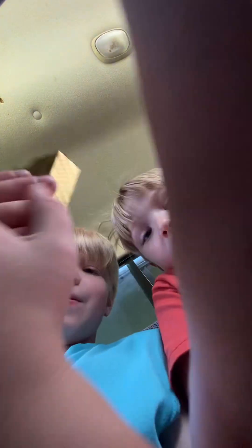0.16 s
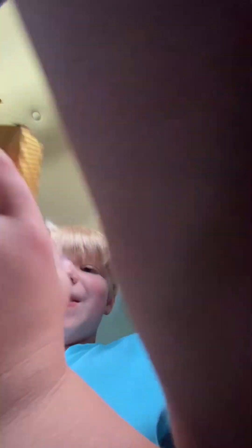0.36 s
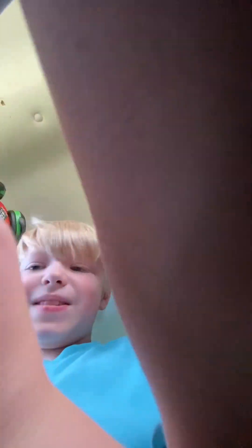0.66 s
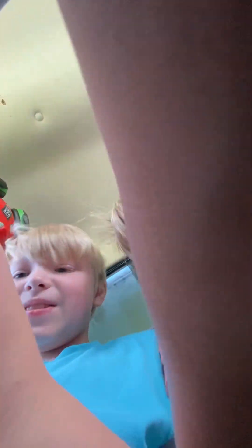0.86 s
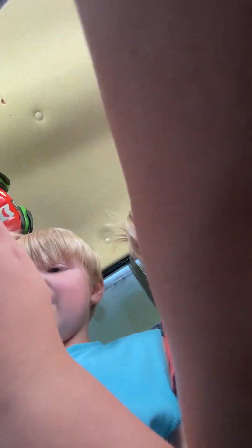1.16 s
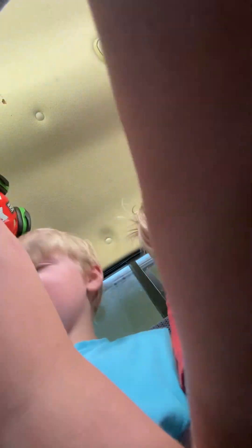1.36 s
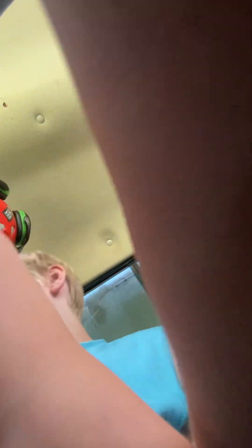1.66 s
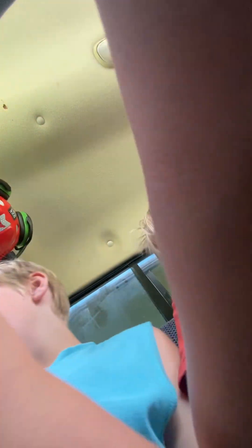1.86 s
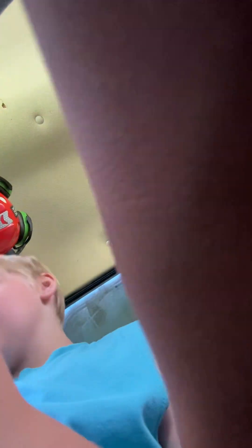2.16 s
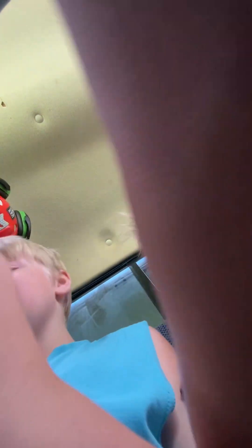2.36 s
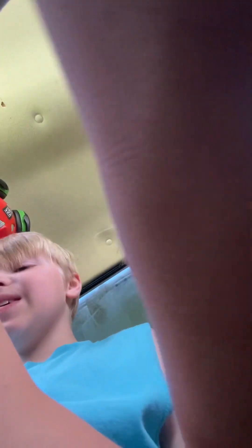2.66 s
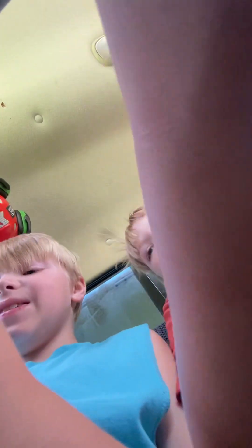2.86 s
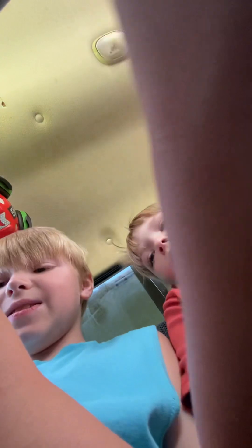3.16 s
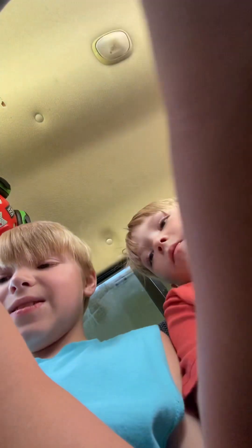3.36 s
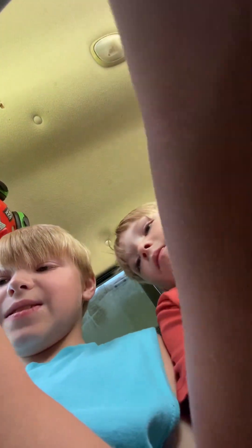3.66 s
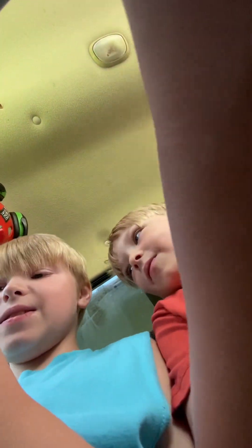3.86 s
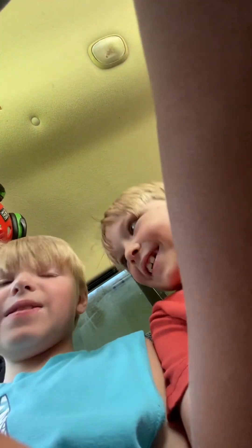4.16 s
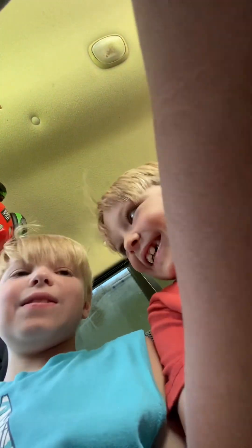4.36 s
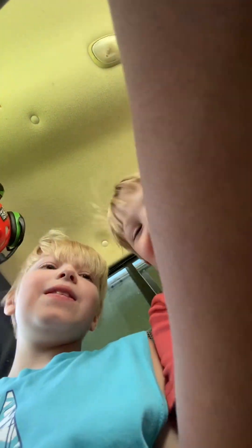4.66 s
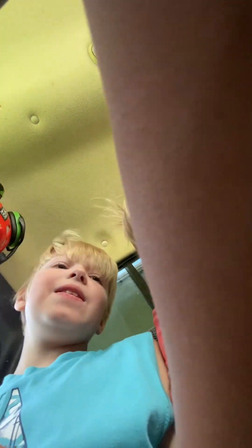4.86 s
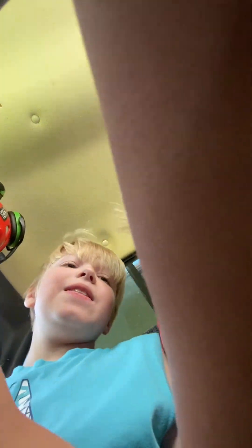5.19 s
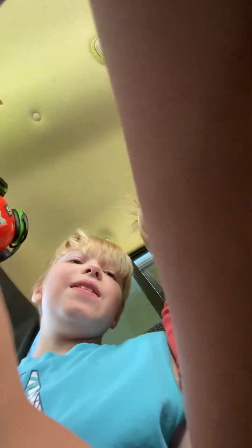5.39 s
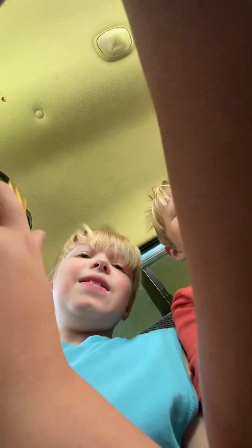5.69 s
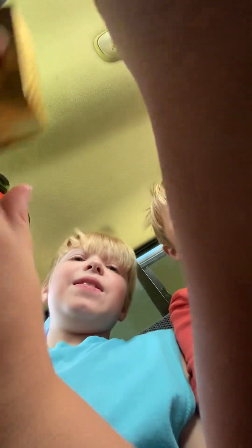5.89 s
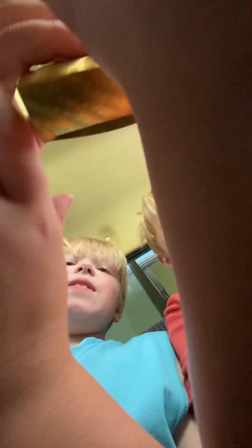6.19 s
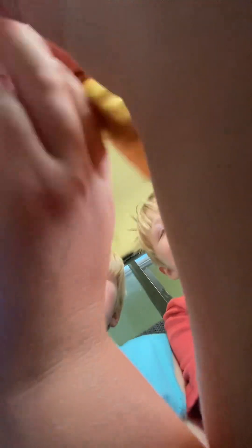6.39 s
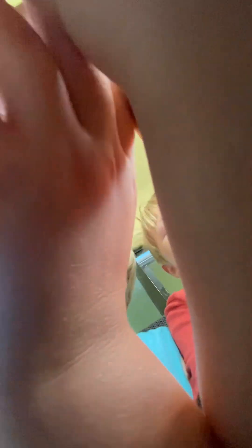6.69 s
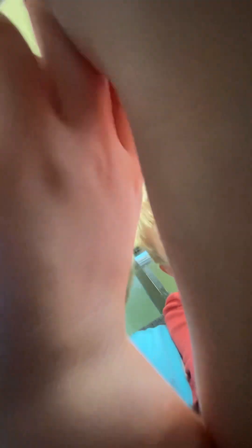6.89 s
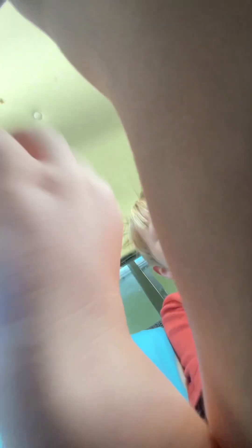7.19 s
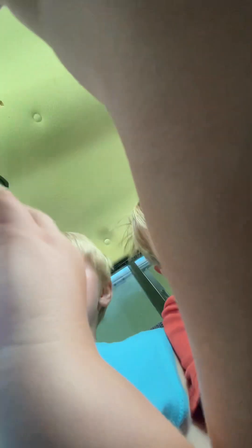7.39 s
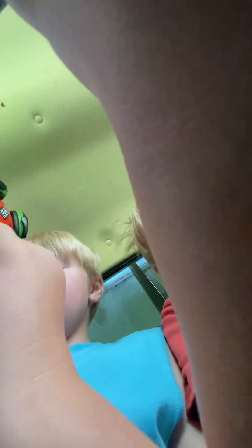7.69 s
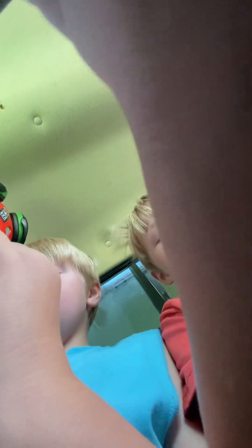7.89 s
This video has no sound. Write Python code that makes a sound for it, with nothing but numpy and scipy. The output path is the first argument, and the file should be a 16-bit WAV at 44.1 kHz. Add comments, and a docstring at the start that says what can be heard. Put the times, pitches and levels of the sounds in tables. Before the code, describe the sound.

Inside a large vehicle gathering speed, a low engine boom holds steady, then climbs slightly in pitch and swells with tyre and air roar. Trim panels ping faintly. Small hard clicks cluster close to the microphone in the first half, then return more sparsely with short cloth rustles. A phone held low hears it all in stereo, boomy and muffled, with no talking.

```python
"""Inside a large vehicle that gathers speed, heard by a phone held low between the seats.
The engine booms on its rising firing rate and gears whine faintly, both built from sines.
Tyres and air roar through the hollow body as shaped noise; kicked resonators make trim panels ping.
Something small and hard ticks close by, as paired clicks with a rattle, ring and thud.
Cloth rustles briefly, as short bursts of grainy band noise."""
import sys
import numpy as np
from scipy import signal
from scipy.fft import rfft, irfft, next_fast_len
from scipy.io import wavfile
from scipy.ndimage import uniform_filter1d, minimum_filter1d

SR = 44100
rng = np.random.default_rng(int(sys.argv[2]) if len(sys.argv) > 2 else 0)


def inscribe(sig):
    """Save sig as 16-bit PCM at rate SR to the path in sys.argv[1].

    A 1-D sig is mono; a 2-D sig holds one channel per row.
    Samples are clipped to [-1, 1] before scaling.
    """
    pcm = np.round(np.clip(np.atleast_2d(sig).T, -1, 1) * 32767)
    wavfile.write(sys.argv[1], SR, pcm.astype(np.int16))


N = 354563

# Road roar growing with speed. Each row: time in seconds, base level in dB.
ROAR_GROWTH = [(0, -35), (1, -33.5), (2.5, -30.5), (4, -27.5), (5.2, -24.5), (6.5, -24), (8.04, -21)]


def undb(db):
    """Amplitude factor for a level in dB."""
    return 10 ** (np.asarray(db) / 20)


def walk(rate):
    """Random levels held 1 / rate seconds and smoothed twice; spread near 1."""
    hold = int(SR / rate)
    steps = np.repeat(rng.standard_normal(N // hold + 1), hold)
    return 1.255 * uniform_filter1d(uniform_filter1d(steps, hold), hold)[:N]


def along_time(table):
    """Each column of a table drawn as a line through its times."""
    seconds, *columns = np.transpose(table)
    return [np.interp(np.arange(N) / SR, seconds, column) for column in columns]


def along_hz(table, hz):
    """Each column of a table drawn as a line over log frequency."""
    table_hz, *columns = np.transpose(table)
    return [np.interp(np.log(hz + 1), np.log(table_hz), column) for column in columns]


def left_right(mid, side):
    """Turn mid and side into left and right."""
    return np.array([mid + side, mid - side])


def fading(t, t60_s):
    """Exponential fall by 60 dB in t60_s seconds."""
    return np.exp(-np.log(1000) * t / t60_s)


def engine():
    """Boom and gear whine: sines at multiples of the firing rate, each wavering in level by itself."""
    # Each row: time in seconds, firing rate in Hz, boom level in dB.
    engine_run = [(0, 73.7, -20.3), (1.9, 73.65, -20.5), (2.4, 73.8, -18.8), (3.1, 74.7, -15.7),
                  (3.9, 75.8, -13.7), (5.1, 77.6, -11.8), (6.3, 79.35, -11.3), (7.1, 80.7, -10.6),
                  (8.04, 81.9, -10.5)]
    # Each row: multiple of the firing rate, level re the boom in dB, gain in dB per Hz of firing rate,
    # side minus mid in dB, side phase in radians, waver in dB.
    engine_orders = [(1, 0, 0, -23, .8, .5), (2, -15, .3, -15, -.5, .6), (3, -20.5, -1.6, -9, -.9, .6),
                     (4, -31, 0, -10, -.6, 1.5), (6, -32, .4, -8, -.6, 3.0),
                     (18.75, -46, 2.0, -3, 1.5, 2.5), (22.54, -36, -.2, -4, 2.0, 2.0),
                     (27.95, -56, -3.5, 0, 2.2, 2.5)]
    mid_rate_hz = 77  # the order levels hold at this firing rate
    dead_hz, dead_width_hz, dead_db = 1755, 70, -9  # the panels pass little engine tone around here
    rate_hz, boom_db = along_time(engine_run)
    turn = 2 * np.pi * np.cumsum(rate_hz * (1 + .0003 * walk(5))) / SR
    out = 0
    for order, order_db, slope_db, side_db, lead, waver_db in engine_orders:
        phase = order * turn + .04 * walk(9) + 2 * np.pi * rng.random()
        level_db = boom_db + order_db + slope_db * (rate_hz - mid_rate_hz) + waver_db * walk(11)
        level_db = level_db + dead_db / (1 + ((order * rate_hz - dead_hz) / dead_width_hz) ** 2)
        mid = np.sin(phase)
        side = undb(side_db) * np.sin(phase + lead)
        out = out + np.sqrt(2) * undb(level_db) * left_right(mid, side)
    return out


def roar():
    """Tyre and air noise in the body resonances; half-octave bands flicker alone over the road surface."""
    # Each row: frequency in Hz, relative mid density in dB per Hz.
    mid_colour = [(18, -39), (27, -24.5), (40, -12.5), (60, -11), (95, -13), (134, -18), (190, -22),
                  (320, -26), (560, -29), (900, -39), (1600, -45.5), (2560, -59.5), (3600, -68),
                  (5100, -73.5), (6100, -72), (7600, -79.5), (8800, -97), (15500, -100)]
    # Each row: frequency in Hz, side density in dB per Hz on the scale of the mid.
    side_colour = [(20, -59), (40, -43), (95, -30), (134, -38.5), (190, -29.5), (320, -40.5), (450, -35.5),
                   (640, -30), (900, -31.5), (1500, -44), (1850, -58), (2560, -54), (3700, -67),
                   (4900, -67), (6200, -71.5), (7300, -74.5), (12000, -79.5), (15500, -96)]
    # Cabin resonances and dips. Each row: centre in Hz, width in Hz, lift in dB.
    cabin = [(475, 121, 7), (545, 26, -7), (664, 49, 8), (1050, 85, 1), (1333, 140, 4.5), (1610, 43, 0.5),
             (1886, 29, 3), (2260, 130, 1.5), (2830, 130, -3), (3420, 90, 2.5), (4170, 120, 3)]
    # How side follows mid at the two microphone ports.
    # Each row: frequency in Hz, likeness from 0 to 1, phase in radians.
    ports = [(40, .5, 1.6), (95, .8, .7), (135, .55, -.1), (250, .72, -.4), (450, .68, -.6),
             (700, .56, -1.5), (905, .32, -.2), (1200, .68, -.9), (1800, .3, -1.5), (2200, .3, -4.4),
             (3200, .35, -3.2), (4500, .45, -4.2), (6500, .65, -4.5), (9500, .1, -5.1)]
    rumble_start_db, rumble_rise_db_per_s = 4.5, -0.7  # lows re the roar: they grow more slowly
    rumble_top_hz, rumble_octaves = 70, 3.15  # full below the top, faded out over this span above it
    hiss_db = 3  # extra treble, blended in from 750 Hz to 2250 Hz
    swell_s, swell_length_s, swell_db, swell_top_hz = 0.576, 0.058, 5.5, 3300

    size = next_fast_len(N)
    hz = np.arange(size // 2 + 1) * SR / size
    lift_db = sum(db / (1 + ((hz - f) / (width / 2)) ** 2) for f, width, db in cabin)
    shared, own = rfft(rng.standard_normal((2, size)))
    like, lead = along_hz(ports, hz)
    like = np.clip(like, 0, 1)
    side_noise = like * np.exp(1j * lead) * shared + np.sqrt(1 - like ** 2) * own
    mid = undb(along_hz(mid_colour, hz)[0] + lift_db) * shared
    side = undb(along_hz(side_colour, hz)[0] + lift_db) * side_noise
    # the mid between 250 Hz and 1500 Hz sets the overall scale
    middle = (hz > 250) & (hz < 1500)
    scale = np.sqrt(2 * np.sum(np.abs(mid[middle]) ** 2)) / size

    t = np.arange(N) / SR
    roar_db = along_time(ROAR_GROWTH)[0]
    rumble_db = rumble_start_db + rumble_rise_db_per_s * t
    # gusts lift the upper middle bands together, with one brief stronger swell
    swell = 0.3 * walk(7.9) + swell_db * np.exp(-((t - swell_s) / swell_length_s) ** 2)
    step = 2 * np.log2(np.maximum(hz, 20) / 20)  # half octaves above 20 Hz
    out = 0
    for k in range(21):
        band = np.cos(np.pi / 2 * np.clip(step - k, -1, 1)) ** 2
        centre = 20 * 2 ** (k / 2)
        lowness = np.clip(1 - np.log2(centre / rumble_top_hz) / rumble_octaves, 0, 1)
        flicker_db = .3 + min(centre / 700, .9) - min(centre / 8000, .6)
        swell_share = np.clip(centre / 1500, 0, 1) * (centre < swell_top_hz)
        band_db = roar_db + rumble_db * lowness + hiss_db * np.clip(centre / 1500 - .5, 0, 1)
        band_db = band_db + flicker_db * walk(10) + swell_share * swell
        out = out + undb(band_db) * irfft(band * left_right(mid, side), size)[:, :N]
    return out / scale


def pings():
    """Bumps in the road kick trim panels, which ring and die away; each kick has its own side."""
    # Each row: panel pitch in Hz, kick level re the roar in dB.
    panels = [(380, -3.5), (520, -5.5), (700, -3), (850, -8), (1150, -13.5), (1300, -15), (1460, -17.5),
              (1700, -22)]
    # One clear ping: time in seconds, pitch in Hz, kick level in dB.
    clear_s, clear_hz, clear_db = (.485, 1450, -35)
    kicks_per_s, ring_t60_s, spread_db = 12, .1, 2.2  # kick rate is for each panel
    roar_db = along_time(ROAR_GROWTH)[0]
    clear = np.zeros(N)
    clear[int(clear_s * SR)] = undb(clear_db)
    voices = [(clear_hz, clear * np.ones((2, 1)))]
    for hz, panel_db in panels:
        when = rng.random(N) < kicks_per_s / SR
        extra_db = spread_db * rng.exponential(size=N)
        pan = rng.uniform(-1, 1, N)
        voices.append((hz, when * undb(roar_db + panel_db + extra_db) * left_right(0.61, pan)))
    push = np.hanning(400)  # softens the onset of each kick
    fall = fading(1 / SR, ring_t60_s)
    out = 0
    for hz, kicks in voices:
        pushed = signal.oaconvolve(kicks, push[None] / push.sum())[:, :N]
        shape = signal.lfilter([1], [1, -fall], pushed)
        out = out + shape * np.sin(2 * np.pi * hz * np.cumsum(1 + .012 * walk(3)) / SR)
    return out


def ticks():
    """Two quick contacts, each a hard click, rattling tail, ring and thud; each port hears its own version."""
    # Each row: start in seconds, level in dB, left minus right in dB, brightness in dB per octave,
    # second contact re the first in dB, pitch that rings most in Hz.
    tick_events = [(1.7602, -33.5, -2, 0, 0.5, 2100), (2.23, -36, -1, 3, -12, 3100),
                   (2.238, -26.5, -1, 2, -11, 2400), (2.5685, -42, -2, -1, -20, 4800),
                   (2.576, -19.5, -3, -1.5, -21, 4600), (2.6044, -39, -1, 12, -15, 4300),
                   (2.765, -46, 3, 4, -10, 4300), (2.8295, -33, 6.5, -3, 9, 2100),
                   (3.056, -29, -2, 2, -1, 2900), (3.3088, -26.5, -3, 1.5, -12, 2900),
                   (3.5268, -29, -2, 2, -5, 3300), (3.716, -31, 0, 5, -6, 5900),
                   (3.7197, -22, -2, 0, -17, 3200), (5.7095, -31, -7, 5, -20, 5900),
                   (5.755, -34, -1, 0, -5, 3800), (5.7795, -35, -1, -1, -4, 3800),
                   (5.7925, -37, 0, 2, -10, 4000), (6.2123, -38, 1, 3, -14, 3100),
                   (6.2494, -41, 6, 5, -15, 2600), (6.3508, -34.5, -1, 3, -15, 6000),
                   (6.786, -42, 1, 5, -15, 4400), (7.3407, -34, -4, 0, -13, 2600)]
    # Each row: ring pitch in Hz, level in dB, time to fall 60 dB in seconds.
    ring_modes = [(1500, -1.5, .03), (2150, -1.5, .03), (2600, -3, .03), (3100, -1.5, .03),
                  (3750, -2.5, .025), (4400, -3, .02), (5700, -3, .018)]
    # Each row: frequency in Hz, relative mid density in dB per Hz, relative side density in dB per Hz.
    crack_colour = [(900, -3, -3.5), (1700, 3.5, 0.5), (3200, 0.5, 1.5), (4100, -1.5, -2), (5000, -8.5, -4),
                    (5900, -2.5, -2), (7600, -11.5, -8), (9000, -33.5, -11), (13000, -20.5, -14.5),
                    (15500, -25, -23)]
    click_s, click_peak = 0.00109, 2.2  # half length; height over the tail's scale
    rattle_db, rattle_t60_s, tail_db, tail_t60_s = -3.5, .012, -14, .045
    ring_db, ring_fall_db_per_octave = -12, 7  # modes away from the favoured pitch ring less
    thud_db, thud_hz, thud_t60_s = -9, 780, .04
    favour_lift_db, favour_octaves = 7, 0.23  # the crack is lifted around the pitch that rings most
    bounce_s = 0.0038

    length = 2048
    out = np.zeros((2, N + SR))
    t = np.arange(length) / SR
    bins = np.arange(length // 2 + 1) * SR / length
    mode_hz, mode_db, mode_t60 = np.transpose(ring_modes)[:, :, None]
    count = len(tick_events)
    chance = rng.standard_normal((count, 2, 3, len(ring_modes), 1))
    # axes: tick, mid or side, contact, frequency
    noise = rfft(rng.standard_normal((count, 2, 2, length)))
    # pulses centred at click_s, each with a random phase
    pulses = np.exp(2j * np.pi * (rng.random((count, 2, 2, 1)) - bins * click_s))
    rise = 1 - np.exp(-t / click_s)
    click_window = np.exp(-((t - click_s) / click_s) ** 2)
    tail_shape = undb(rattle_db) * fading(t, rattle_t60_s) + undb(tail_db) * fading(t, tail_t60_s)
    thud = fading(t, thud_t60_s) * np.sin(2 * np.pi * thud_hz * t)
    thud = undb(thud_db) * thud * np.array([[1], [-1]])  # opposite at the two ports

    for event, draw, grit, pulse in zip(tick_events, chance, noise, pulses):
        start_s, level_db, pan_db, tilt_db, bounce_db, ring_hz = event
        favour_db = favour_lift_db * np.exp(-(np.log2((bins + 1) / ring_hz) / favour_octaves) ** 2)
        colour_db = np.array(along_hz(crack_colour, bins))[:, None]
        colour = undb(colour_db + tilt_db * np.log2((bins + 1) / 4000) + favour_db)
        # contact first, then left and right
        clicks = np.swapaxes(left_right(*irfft(pulse * colour)), 0, 1)
        tails = np.swapaxes(left_right(*irfft(grit * colour)), 0, 1)
        clicks = clicks * click_window * click_peak / np.abs(clicks).max()
        tails = tails / tails.std() * tail_shape

        away_db = ring_fall_db_per_octave * np.abs(np.log2(mode_hz / ring_hz))
        ring = []
        for vary_level, vary_pitch, vary_phase in draw:
            size = undb(mode_db + 2.1 * vary_level - away_db)
            cycles = mode_hz * (1 + 0.04 * vary_pitch) * t + vary_phase
            ring.append(np.sum(size * fading(t, mode_t60) * np.sin(2 * np.pi * cycles), axis=0))
        ring = np.array(ring)

        pan = np.array([[pan_db], [-pan_db]]) / 2
        for click, tail, late_s, change_db in zip(clicks, tails, (0, bounce_s), (0, bounce_db)):
            hit = click + rise * (tail + undb(ring_db) * ring) + thud
            i = int((start_s + late_s) * SR)
            out[:, i:i + length] += hit * undb(level_db + change_db + pan)
    return out[:, :N]


def rustle():
    """Cloth brushes past: short, grainy noise, each brush with its own colour."""
    # Each row: start in seconds, length in seconds, level before filtering in dB, centre in Hz,
    # side gain re mid in dB.
    brushes = [(5.326, .04, -59, 9500, 11), (5.673, 0.081, -45, 6600, 3), (5.745, 0.055, -42, 3500, 1),
               (5.742, 0.065, -48, 6900, 3), (6.183, .075, -64, 9000, 13), (6.34, .07, -58, 5500, 4),
               (6.967, 0.019, -49, 6800, 3), (7.22, .07, -75, 10500, 9)]
    half_width_octaves, mid_top_hz = .5, 7800  # above this top the side carries nearly all the hiss
    pan_db = -1.5  # left minus right
    grain = rng.standard_normal((2, N)) * undb(2.5 * walk(220))
    mid_cut = signal.butter(N=8, Wn=mid_top_hz, fs=SR, output="sos")
    out = 0
    for start_s, length_s, level_db, hz, side_db in brushes:
        i, j = int(start_s * SR), int((start_s + length_s) * SR)
        edges = hz * 2 ** np.array([-half_width_octaves, half_width_octaves])
        band = signal.butter(N=2, Wn=edges, btype="band", fs=SR, output="sos")
        stroke = np.sin(np.pi * np.arange(j - i) / (j - i)) ** 0.86
        mid, side = signal.sosfilt(band, grain[:, i:j]) * stroke
        mid = signal.sosfilt(mid_cut, mid)
        brush = undb(level_db) * left_right(mid, undb(side_db) * side)
        out = out + np.pad(brush, ((0, 0), (i, N - j)))
    return out * undb(np.array([[pan_db], [-pan_db]]) / 2)


def scene():
    """All sources together inside the vehicle."""
    return engine() + roar() + pings() + ticks() + rustle()


def record(dry):
    """A look-around limiter eases the highest peaks; the phone cuts the top steeply."""
    knee, top_hz = .93, 15700
    gain = np.minimum(1, knee / (np.abs(dry).max(axis=0) + 1e-9))
    gain = uniform_filter1d(minimum_filter1d(gain, size=441), size=441)  # 10 ms windows
    top_cut = signal.ellip(8, .2, 70, top_hz, fs=SR, output="sos")
    return signal.sosfilt(top_cut, dry * gain)


dry = scene()
out = record(dry)
inscribe(out)
```